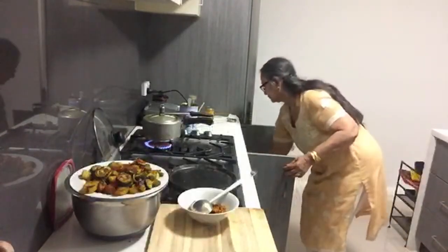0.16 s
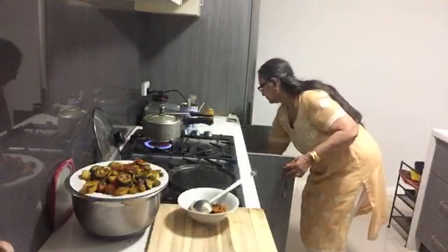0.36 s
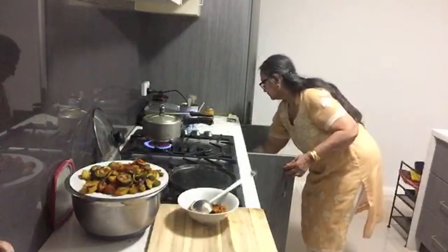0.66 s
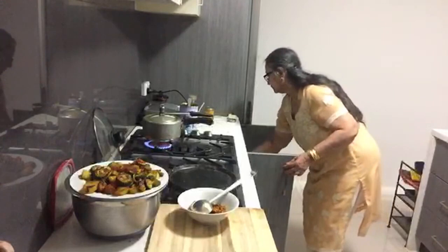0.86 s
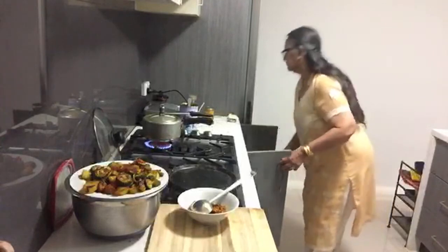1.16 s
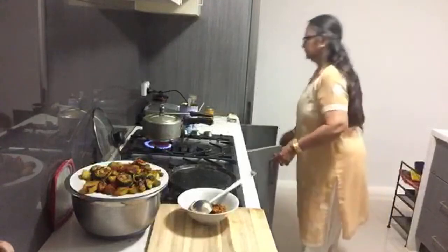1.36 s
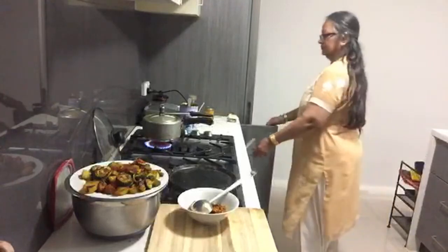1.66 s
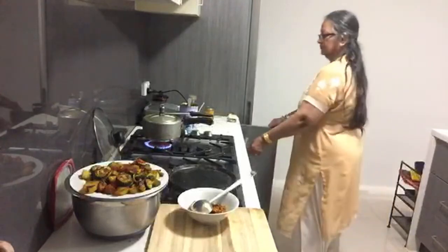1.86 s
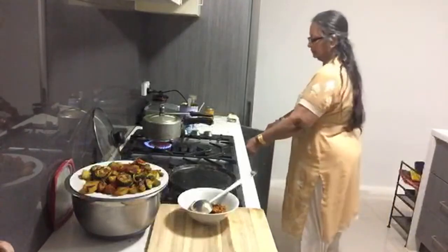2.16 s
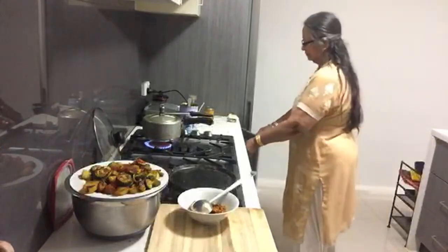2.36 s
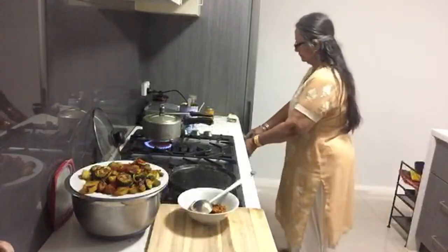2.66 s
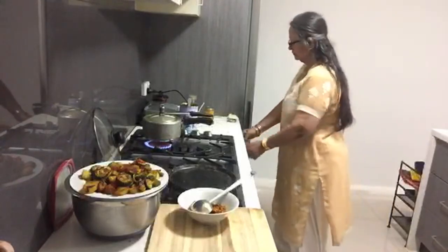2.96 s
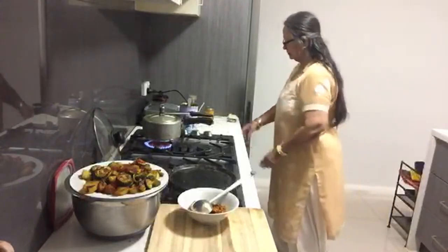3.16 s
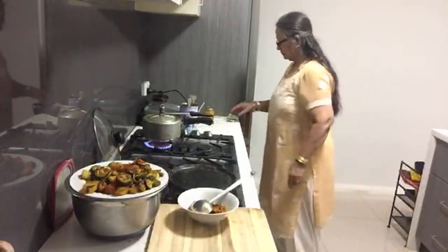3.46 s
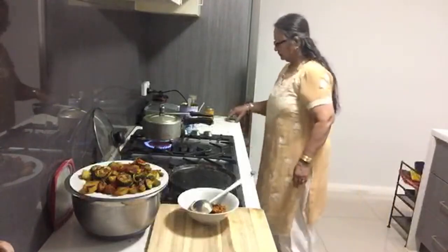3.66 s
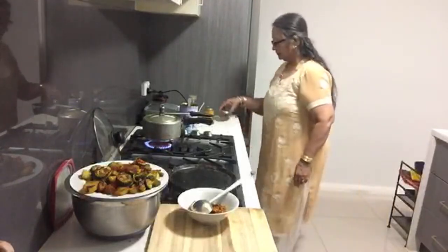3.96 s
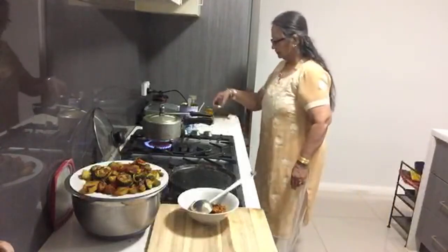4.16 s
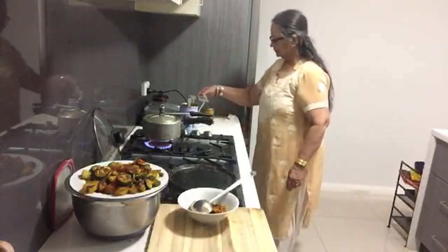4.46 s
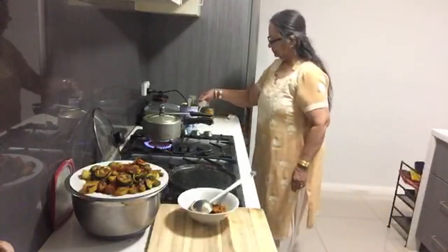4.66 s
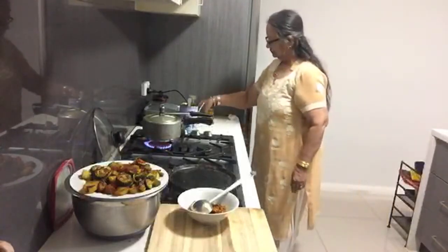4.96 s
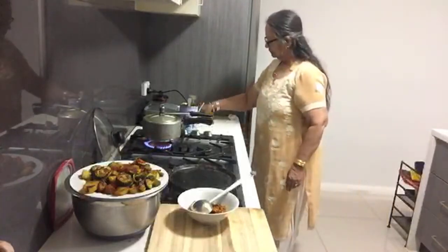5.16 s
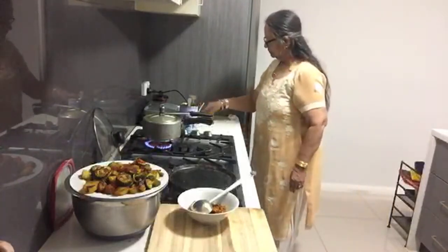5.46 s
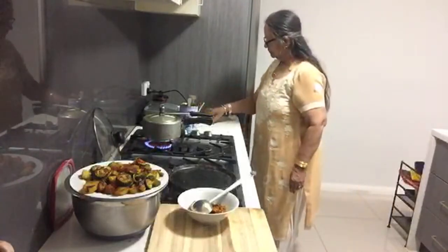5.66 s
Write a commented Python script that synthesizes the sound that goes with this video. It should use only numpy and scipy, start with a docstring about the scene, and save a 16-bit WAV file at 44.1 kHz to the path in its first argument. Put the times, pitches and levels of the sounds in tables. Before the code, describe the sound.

Pots clatter in a kitchen cupboard, its doors bump, squeak and bang shut, and steam hisses softly on a gas stove.

```python
"""In a small tiled kitchen, appliances hum and a pressure cooker hisses on a gas flame throughout.
First, pots knock about in a low cupboard. After two seconds its doors bump, a hinge squeaks,
and the level dips twice, briefly, just before the doors shut with a rattling thump.
Then a steel lid clinks faintly at the stove and something is set down on the counter.
Near the end the lid clinks again. Each struck thing gives a short clatter and rings on."""
import sys
import numpy as np
from scipy import signal
from scipy.io import wavfile
from scipy.ndimage import uniform_filter1d

SR = 44100
rng = np.random.default_rng(int(sys.argv[2]) if len(sys.argv) > 2 else 0)


def master_out(mix):
    """Clip the mix to full scale and print it as 16-bit PCM to the path in sys.argv[1]."""
    frames = np.transpose(np.atleast_2d(mix))
    ceiling = np.clip(frames, -1, 1)
    pcm = np.round(ceiling * 32767).astype(np.int16)
    wavfile.write(sys.argv[1], SR, pcm)


N = 256220


def amp(db):
    """Turns decibels into a number to multiply by."""
    return 10 ** (np.asarray(db) / 20)


def evened(x):
    """Scales a signal to an average strength (rms) of 1."""
    return x / np.sqrt(np.mean(x ** 2) + 1e-20)


def read(points, hz):
    """Reads between the points of a curve, giving every octave the same width."""
    point_hz, value = np.transpose(points)
    return np.interp(np.log(hz + 1), np.log(point_hz + 1), value)


def add(mix, s, sound):
    """Mixes a sound in at s seconds."""
    part = mix[round(s * SR):][:len(sound)]
    part += sound[:len(part)]


def noise(spectrum, patchy_db, echo=0, size=1024):
    """Shaped noise that drifts in small patches; wall echoes lift some pitches and weaken others."""
    hz = np.fft.rfftfreq(size, 1 / SR)
    real, imag, patches = rng.standard_normal((3, N * 4 // size + 5, len(hz)))
    patches = uniform_filter1d(patches, size=16, axis=0)  # smooth over time
    patches = evened(uniform_filter1d(patches, size=12, axis=1))  # and over pitch
    delays_s = rng.uniform(.002, .02, (12, 1))
    echoes = np.exp(-2j * np.pi * hz * delays_s).sum(0) / np.sqrt(len(delays_s))
    slices = (real + 1j * imag) * abs(1 + echo * echoes) * amp(read(spectrum, hz) + patchy_db * patches)
    return evened(signal.istft(slices.T, nperseg=size, noverlap=size * 3 // 4)[1][:N])


# The appliances' low tones: (pitch [Hz], level [dB])
HUM_TONES = [(100.7, -59), (88.6, -59)]

def hum(waver=0.24):
    """Appliances hum on two close tones that throb against each other and waver in strength."""
    t = np.arange(N) / SR
    drift_hz = np.geomspace(.7, 9, 20)
    out = np.zeros(N)
    for hz, db in HUM_TONES:
        drift = evened(sum(np.sin(2 * np.pi * (f * t + rng.random())) / f ** 0.23 for f in drift_hz))
        tone = np.sqrt(2) * np.sin(2 * np.pi * (hz * t + rng.random()))
        out += amp(db) * (1 + waver * drift) * tone
    return out


# The flame's noise, from bass to treble: (pitch [Hz], relative level [dB])
FLAME_SPECTRUM = [(25, -38), (40, -41), (50, -6.5), (85, 4.5), (125, -3), (200, -6.5), (320, -10),
                  (480, -17), (900, -20.5), (1500, -20.5), (2000, -24.5), (2400, -24), (4000, -22.5),
                  (9000, -38)]

def flame():
    """The burning gas rumbles softly."""
    return amp(-58.5) * noise(FLAME_SPECTRUM, patchy_db=-0.03, echo=0.5, size=4096)


# The steam's hiss at the valve: (pitch [Hz], relative level [dB])
HISS_SPECTRUM = [(1500, -6), (3100, -9), (3700, -5.5), (4700, -4), (5050, -7), (6100, -0.5), (7800, -3),
                 (8500, 3.5), (9900, 0.5), (10350, -5.5), (11200, -0.5), (12200, 0), (15600, 2)]

def valve_hiss(db=-52, dip_s=3.28, dip_width_s=0.2, dip_db=-2.5):
    """The valve's steady hiss is turned down slightly just after the doors slam, then comes back."""
    t = np.arange(N) / SR
    dip = np.exp(-((t - dip_s) / dip_width_s) ** 2)
    return amp(db + dip_db * dip) * noise(HISS_SPECTRUM, patchy_db=2.0, echo=1.0)


# The narrow peaks of the steam's whistle: (pitch [Hz], relative level [dB])
WHISTLE_SPECTRUM = [(1400, -40), (1680, -10), (1755, 10.5), (1830, -27), (1950, -10), (2110, -0.5),
                    (2250, -39), (2600, -45)]

def steam_whistle():
    """The steam whistles faintly: noise so narrow in pitch that it sounds like a note."""
    return amp(-69.5) * noise(WHISTLE_SPECTRUM, patchy_db=5.0)


# Spurts of steam past the lid's seal: (start [s], held for [s], level [dB])
STEAM_SPURTS = [(.15, 0.087, -61.5), (1.25, .1, -59), (1.68, 0.19, -59), (2.1, .2, -63.5), (2.82, .2, -65),
                (3.77, 1.5, -57.5), (5.55, .26, -59)]
# Their wheezing noise: (pitch [Hz], relative level [dB])
WHEEZE_SPECTRUM = [(3000, -35), (5300, -20), (6100, 0.5), (6600, -2), (7350, 2), (7900, -3), (8300, -1),
                   (9700, -14.5), (10400, -7), (15000, -33)]

def seal_wheeze(open_s=0.031, close_s=0.18, seep_db=-71):
    """Each leak in the seal opens quickly, holds and closes slowly; in between, steam only seeps."""
    t = np.arange(N) / SR
    flow = np.full(N, amp(seep_db))
    for start, hold_s, db in STEAM_SPURTS:
        opening = np.clip((t - start) / open_s, 0, 1)
        closing = np.exp(-np.maximum(t - start - hold_s, 0) / close_s)
        flow = np.maximum(flow, amp(db) * opening * closing)
    return flow * noise(WHEEZE_SPECTRUM, patchy_db=4.0, echo=0.36)


# How long the kitchen echoes: (pitch [Hz], time to fade by 60 dB [s])
ROOM_FADE = [(60, 1), (200, 0.76), (700, 0.62), (1800, 0.68), (3500, 0.72), (7000, 0.75), (14000, 0.39)]

def room(x, echo_db, build_s=0.0078):
    """Hard walls add a crowd of echoes that builds up, then fades at its own pace for each pitch."""
    t = np.arange(SR) / SR
    echoes = rng.choice([-1., 1.], SR) * (rng.random(SR) < 4000 / SR)  # about 4000 a second
    echoes *= 1 - np.exp(-t / build_s)
    hz, age, slices = signal.stft(echoes, SR, nperseg=256)
    fade = amp(-60 * age / read(ROOM_FADE, hz)[:, None])
    tail = signal.istft(slices * fade, SR, nperseg=256)[1]
    return x + amp(echo_db) * signal.fftconvolve(x, tail / np.linalg.norm(tail))[:N]


def sharpest_click(gain):
    """The quickest click that has the given strength at each pitch."""
    log_gain = np.log(np.maximum(gain, gain.max() * 1e-5))
    mirrored = np.concatenate([log_gain, log_gain[-2:0:-1]])
    return np.fft.ifft(np.exp(np.conj(signal.hilbert(mirrored)))).real


def contact(hz, dull_hz, thin_hz):
    """A soft blow loses the treble above dull_hz; a light or glancing one, the bass below thin_hz."""
    return 1 / np.sqrt((1 + (hz / dull_hz) ** 4) * (1 + (thin_hz / (hz + 1)) ** 4))


def struck(blows, body, notes, clatter_s, swell_s, echo_db, size=8192):
    """Each blow sets off a clatter (a blur of short notes) that echoes, while clear notes ring on."""
    t, hz = np.arange(SR) / SR, np.fft.rfftfreq(size, 1 / SR)
    swell = 1 - np.exp(-t / swell_s)  # the shaking takes a moment to spread through the object
    clatter_shape = (swell * amp(-60 * t / clatter_s))[:size]
    note_hz, note_db, fade_s = np.transpose(notes)
    cycles = np.outer(note_hz, t)
    swing_up = 1 - np.exp(-np.minimum(cycles, 20))  # each note needs about one more cycle to grow
    tones = swell * swing_up * np.sin(2 * np.pi * cycles) * amp(-60 * t / fade_s[:, None])
    blow_samples = .02 * SR  # a clatter's level counts its energy as if spread over 20 ms
    clatter, ringing = np.zeros((2, N))
    for s, db, dull_hz, thin_hz, ring_db in blows:  # ring_db lifts or lowers only the clear notes
        click = sharpest_click(amp(read(body, hz)) * contact(hz, dull_hz, thin_hz))
        hit = signal.fftconvolve(clatter_shape * rng.standard_normal(size), click)
        add(clatter, s, amp(db) * np.sqrt(blow_samples) * hit / np.linalg.norm(hit))
        note_gains = amp(db + ring_db + note_db) * contact(note_hz, dull_hz, thin_hz)
        add(ringing, s, note_gains @ tones)
    return room(clatter, echo_db) + ringing


# Pots landing: (time [s], level [dB], thin below [Hz], extra ring [dB], rocks after [s],
# rock compared with landing [dB])
POT_LANDINGS = [(.262, -44, 1200, -6, 0.02, -7), (.492, -38.5, 600, 3, .012, 0),
                (.737, -52.5, 2370, 6, 0.016, -10), (.809, -39.5, 1950, -2, 0.016, 1)]
# The shelf gives under the heaviest pot: (time [s], level [dB], dull above [Hz], thin below [Hz])
SHELF_BLOWS = [(.52, -46.5, 455, 150), (.552, -49.5, 121, 49.6)]
# A pot's clatter: (pitch [Hz], relative level [dB])
POT_CLATTER = [(200, -8), (600, -11.5), (950, -1.5), (1400, -3), (1800, 0.5), (2500, -5.5), (3300, -10.5),
               (4300, -14.5), (5000, -16.5), (5450, -10.5), (6000, -11.5), (6800, -11), (8000, -21),
               (14000, -13)]
# Its clear notes: (pitch [Hz], relative level [dB], time to fade by 60 dB [s])
POT_NOTES = [(953, -8, 0.21), (1157, -13, 0.4), (1338, -9, 0.35), (1630, -16, 0.28), (1826, -7.5, 0.25),
             (2040, -13, 0.4), (2505, -10, 0.25), (2720, -27, 0.21), (3000, -22, .3), (5480, -10, 0.36),
             (5560, -13.5, 0.47)]

def pots(graze_s=.005, graze_db=-9.5, landing_dull_hz=5560, rock_dull_hz=3150, shelf_ring_db=-12):
    """Each pot grazes the shelf, lands and rocks onto its other edge; the shelf thuds below."""
    blows = []
    for s, db, thin_hz, ring_db, rock_s, rock_db in POT_LANDINGS:
        blows += [(s - graze_s, db + graze_db, landing_dull_hz, thin_hz, ring_db),
                  (s, db, landing_dull_hz, thin_hz, ring_db),
                  (s + rock_s, db + rock_db, rock_dull_hz, thin_hz, ring_db)]
    blows += [(*thud, shelf_ring_db) for thud in SHELF_BLOWS]
    return struck(blows, POT_CLATTER, POT_NOTES, clatter_s=0.064, swell_s=0.0033, echo_db=-1.2)


# Doors bumping: (time [s], level [dB], thin below [Hz], extra ring [dB], bounce compared with bump [dB])
BUMPS = [(2.3215, -34, 65, 6, -7), (2.598, -39.5, 159, 4.5, -22), (2.6645, -42, 111, 6.5, 1),
         (2.745, -46, 200, -9, -14), (2.838, -53.5, 120, -6, -14)]
# A bumped door's clatter: (pitch [Hz], relative level [dB])
BUMP_CLATTER = [(40, -30), (60, -6), (100, -5.5), (320, 0), (450, -8.5), (650, -4.5), (900, -7.5),
                (1350, -8.5), (2000, -8.5), (3000, -17), (5000, -19.5), (9000, -28)]
# Its clear notes: (pitch [Hz], relative level [dB], time to fade by 60 dB [s])
BUMP_NOTES = [(76.5, -3.5, 0.23), (103.4, 3, 0.34), (158, -4.5, 0.31), (196, -5.5, 0.27), (217, -13, 0.58),
              (324.5, -5, 0.39), (490, -15.5, 0.21), (810, -15.5, 0.2), (987, -15, 0.3), (1320, -12, 0.14),
              (1486, -18, 0.24)]

def door_bumps(bump_dull_hz=2110, bounce_s=.015, bounce_dull_hz=2000):
    """A swinging cupboard door bumps softly, with one quick bounce each time."""
    blows = []
    for s, db, thin_hz, ring_db, bounce_db in BUMPS:
        blows += [(s, db, bump_dull_hz, thin_hz, ring_db),
                  (s + bounce_s, db + bounce_db, bounce_dull_hz, thin_hz, ring_db)]
    return struck(blows, BUMP_CLATTER, BUMP_NOTES, clatter_s=0.099, swell_s=0.0059, echo_db=-0.5)


# The hinge's one squeak: (time [s], length [s])
SQUEAK = (2.67, .1)

def hinge_squeak(hz=894, peak_db=-39, waver=0.012):
    """The closing hinge squeaks briefly on one unsteady note."""
    s, length_s = SQUEAK
    count, out = int(length_s * SR), np.zeros(N)
    slip = evened(uniform_filter1d(rng.standard_normal(count), size=150))
    cycles = np.cumsum(hz * (1 + waver * slip)) / SR
    add(out, s, amp(peak_db) * np.hanning(count) * np.sin(2 * np.pi * cycles))
    return out


# Two doors shutting: (time [s], clap level [dB], lands after [s], landing level [dB],
# thumps after [s], thump level [dB], thump dull above [Hz])
SLAMS = [(3.0176, -21, .0094, -22.5, .0392, -30, 800), (3.0742, -26, .0055, -25.5, .0309, -24, 2510)]
# A slammed door's clatter: (pitch [Hz], relative level [dB])
SLAM_CLATTER = [(35, -47), (55, 4), (110, -2), (200, 6), (350, -4.5), (500, -5.5), (800, 0), (1100, -1),
                (1650, 1.5), (2300, -6), (2900, -10), (3600, -18), (5000, -26), (9000, -43.5)]
# Its clear notes: (pitch [Hz], relative level [dB], time to fade by 60 dB [s])
SLAM_NOTES = [(64.1, -10, 0.57), (72.2, -4.5, 0.41), (97.8, -15, 0.63), (134.3, -13, 0.4),
              (170.2, -4, 0.33), (192, 2, 0.19), (224.2, -17.5, 0.76), (263, -21, 0.4),
              (388.5, -16.5, 0.54), (581, -21.5, 0.32), (696, -28, 0.99), (1005, -10.5, 0.54),
              (1142, -9.5, 0.25), (1155, -9, 0.31), (1374, -23, 0.64), (1513, -12, 0.32), (1546, -17, 0.46),
              (1660, -21, 0.82), (1976, -23.5, 0.67), (2190, -46, 0.45)]

def door_slams(ring_db=4, thump_ring_db=-1):
    """Each door claps brightly with its edge, lands with its whole panel and thumps back once."""
    clap_dull_hz, clap_thin_hz = 6000, 191
    land_dull_hz, panel_thin_hz = 4900, 49.7
    blows = []
    for s, clap_db, land_s, land_db, thump_s, thump_db, thump_dull_hz in SLAMS:
        blows += [(s, clap_db, clap_dull_hz, clap_thin_hz, ring_db),
                  (s + land_s, land_db, land_dull_hz, panel_thin_hz, ring_db),
                  (s + thump_s, thump_db, thump_dull_hz, panel_thin_hz, thump_ring_db)]
    return struck(blows, SLAM_CLATTER, SLAM_NOTES, clatter_s=0.093, swell_s=0.0021, echo_db=-1.5)


# Knocks on the lid: (time [s], level [dB], dull above [Hz], thin below [Hz], extra ring [dB])
LID_BLOWS = [(3.727, -57.5, 4000, 800, -3), (5.277, -50.5, 6000, 1100, 1), (5.2905, -44, 13000, 1400, -3),
             (5.76, -63, 3010, 900, -10)]
# The lid's clatter: (pitch [Hz], relative level [dB])
LID_CLATTER = [(1000, -21), (1390, 8.5), (1700, -10), (2100, -1.5), (2750, -16), (3360, -9.5),
               (4400, -13.5), (5450, -6), (7500, -15), (9850, -4.5), (10800, -18), (11800, 2), (13000, -11),
               (15000, -11)]
# Its clear notes: (pitch [Hz], relative level [dB], time to fade by 60 dB [s])
LID_NOTES = [(1274, 1, 0.28), (1457, -4.5, 0.26), (2080, -9.5, 0.33), (3358, 2, .2), (5340, -7, 0.33),
             (5620, -6, 0.33), (9890, -9, .25), (11850, -6, .16)]

def lid_clinks():
    """Light knocks make the steel lid ring on high, bright notes."""
    return struck(LID_BLOWS, LID_CLATTER, LID_NOTES, clatter_s=0.07, swell_s=0.0027, echo_db=-2.5)


# Taps on the counter: (time [s], level [dB], dull above [Hz], thin below [Hz], extra ring [dB])
COUNTER_BLOWS = [(3.987, -41.5, 4000, 400, 0.5), (4.007, -45.5, 2000, 292, 1),
                 (4.047, -46.5, 2500, 300, -1)]
# A tap's clatter: (pitch [Hz], relative level [dB])
TAP_CLATTER = [(200, -9.5), (400, 0), (650, -2), (1200, -6), (1900, -8), (3100, -18), (4200, -31),
               (9000, -32)]
# Its clear notes: (pitch [Hz], relative level [dB], time to fade by 60 dB [s])
TAP_NOTES = [(364, -4.5, 0.37), (636, 0, 0.19), (812, -3.5, 0.17), (1172, -8, 0.18), (1613, -10, 0.34)]

def counter_taps():
    """Something is set down and meets the counter in three quick taps."""
    return struck(COUNTER_BLOWS, TAP_CLATTER, TAP_NOTES, clatter_s=0.097, swell_s=0.0011, echo_db=-6.5)


def scene():
    """The knocks and the squeak over the stove and the hum, in one channel."""
    knocks = pots() + door_bumps() + door_slams() + counter_taps() + lid_clinks()
    squeak = hinge_squeak()
    stove = flame() + valve_hiss() + seal_wheeze() + steam_whistle()
    return (knocks + squeak + stove + hum())[None]


# Two brief dips in level: (starts to sink [s], lowest at [s], back at [s], depth [dB])
LEVEL_DIPS = [(2.751, 2.826, 2.838, 22), (2.902, 2.99, 3.012, 32)]

def record(dry):
    """The whole sound sinks and snaps back twice, and its very highest treble is cut off."""
    t = np.arange(N) / SR
    dip_db = sum(np.interp(t, [start, lowest, back], [0, depth_db, 0])
                 for start, lowest, back, depth_db in LEVEL_DIPS)
    treble_cut = signal.firwin(801, 15750, window=("kaiser", 9), fs=SR)  # above 15750 Hz
    return signal.oaconvolve(dry * amp(-dip_db), treble_cut[None], "same")


dry = scene()
out = record(dry)
master_out(out)
```